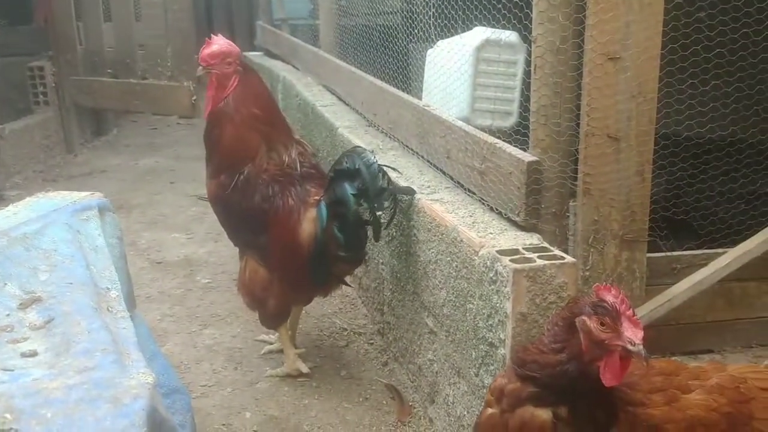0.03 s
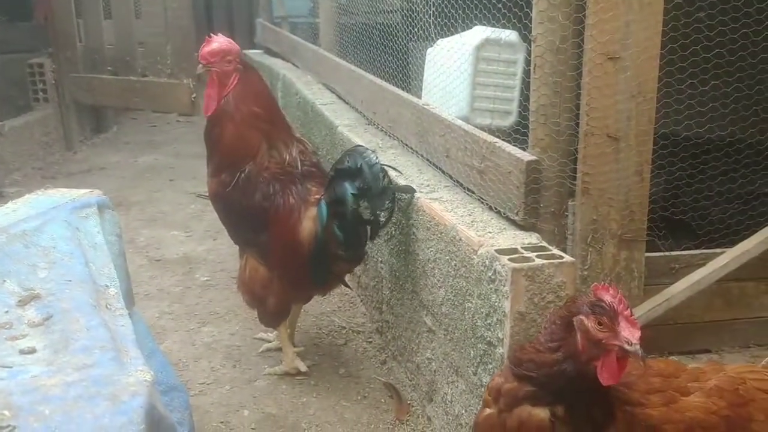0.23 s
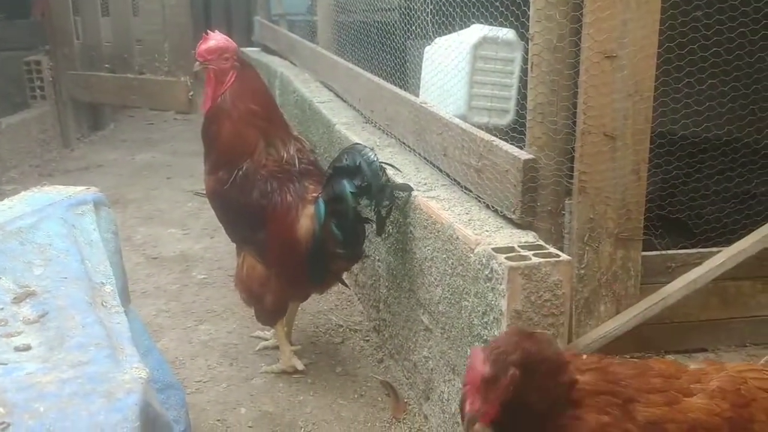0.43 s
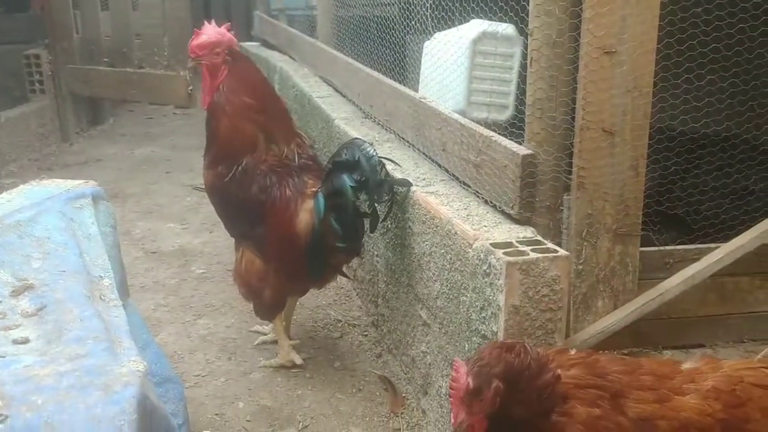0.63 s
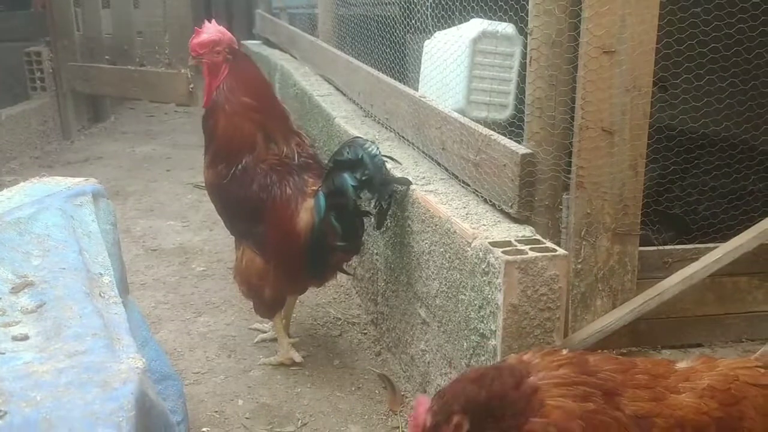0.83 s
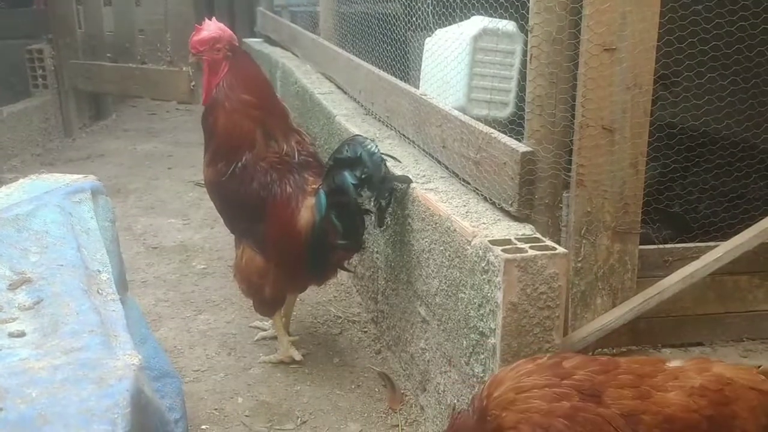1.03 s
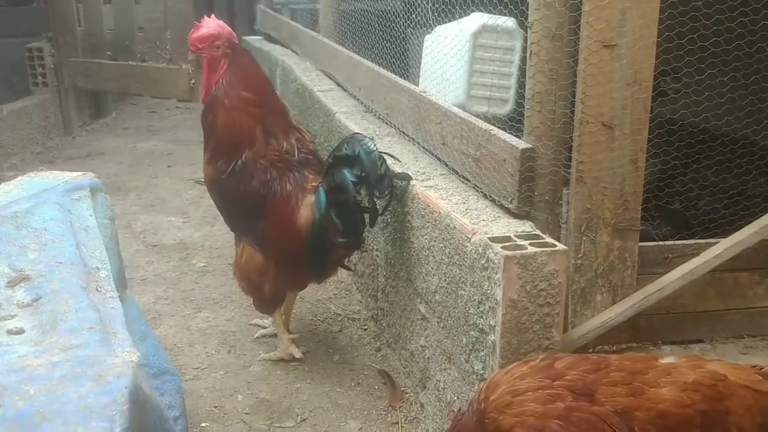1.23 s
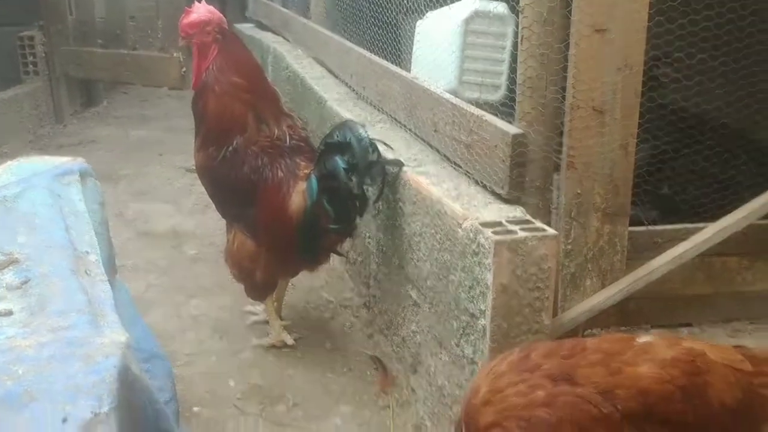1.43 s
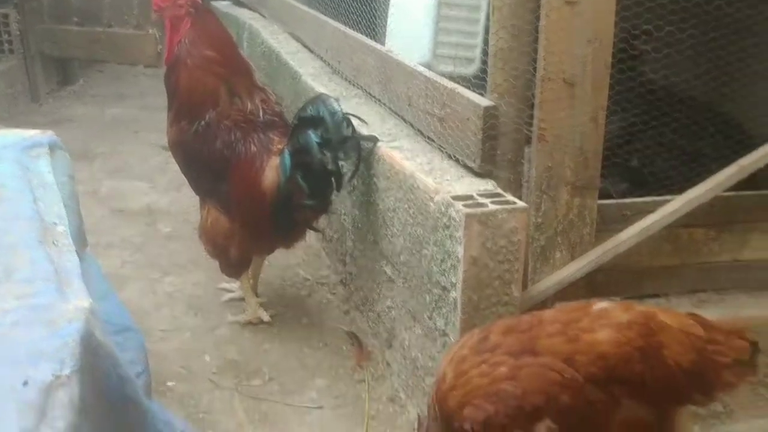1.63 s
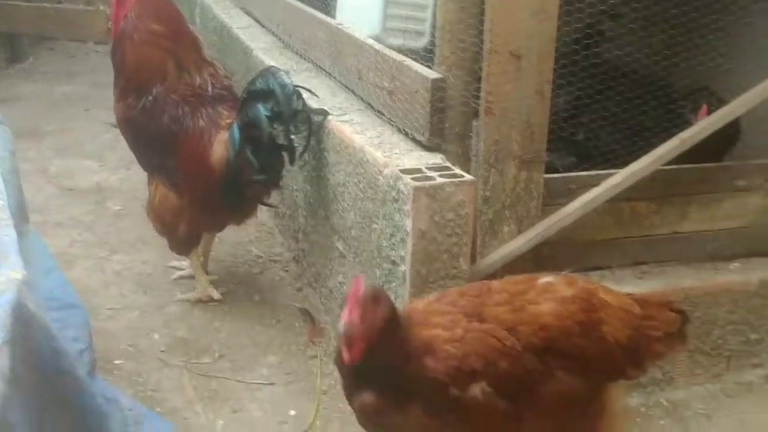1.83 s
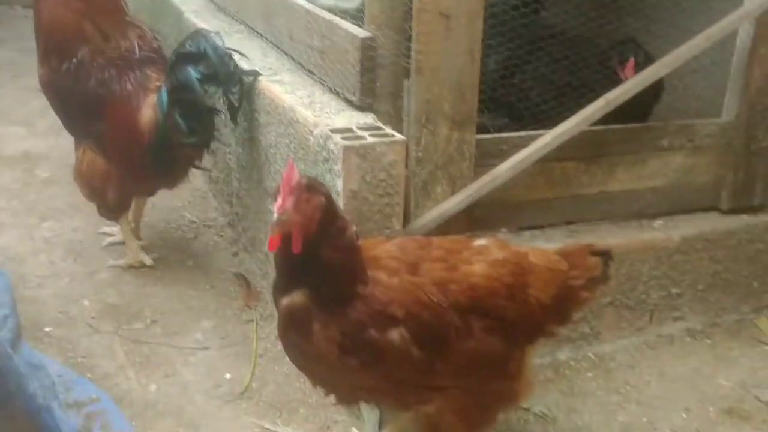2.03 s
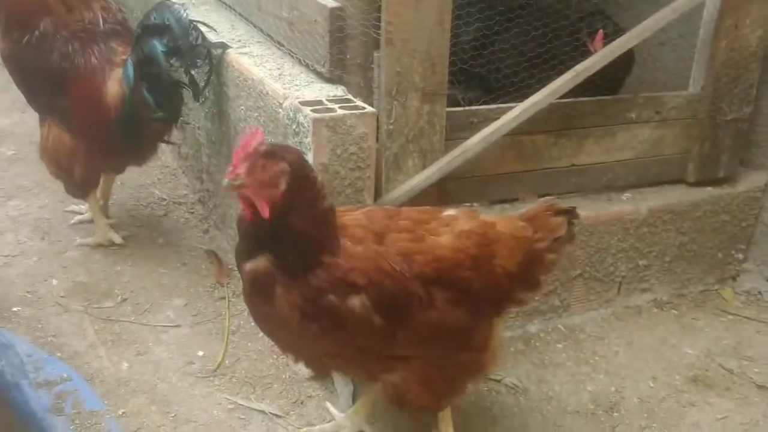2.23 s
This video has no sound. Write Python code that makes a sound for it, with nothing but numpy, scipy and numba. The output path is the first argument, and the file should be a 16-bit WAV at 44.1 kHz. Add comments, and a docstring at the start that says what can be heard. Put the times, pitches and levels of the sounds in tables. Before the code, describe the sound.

One long, raspy rooster crow falls in pitch, followed by a hen's soft cluck.

```python
"""A rooster starts one long, hoarse crow in a small yard, close to a phone. First the two sides of his
voice box (the syrinx) clash in a rasp. Then they lock in a buzz at half the pitch, while a hen scuffs
the dirt and air rumbles on the moving microphone. The crow clears into a falling tone and breaks off
in croaks. Last, the hen moans and clucks, and there is a soft knock."""
import sys
import numpy as np
from scipy import signal
from scipy.fft import rfft, irfft
from scipy.io import wavfile
from scipy.ndimage import uniform_filter1d, minimum_filter1d
from numba import njit

SR = 44100
rng = np.random.default_rng(int(sys.argv[2]) if len(sys.argv) > 2 else 0)


def master_out(mix):
    """Clip the mix to full scale and print it as 16-bit PCM to the path in sys.argv[1]."""
    frames = np.transpose(np.atleast_2d(mix))
    ceiling = np.clip(frames, -1, 1)
    pcm = np.round(ceiling * 32767).astype(np.int16)
    wavfile.write(sys.argv[1], SR, pcm)


N = 101165
T = np.arange(N) / SR
FREQS = np.arange(N // 2 + 1) * SR / N


def amp(db):
    """Turn decibels into a gain."""
    return 10 ** (np.asarray(db) / 20)


def unit(x):
    """Scale to an average power of 1."""
    return x / np.sqrt(np.mean(x ** 2))


def curve(rows, column=1):
    """Follow one column of a table over time."""
    return np.interp(T, np.array(rows)[:, 0], np.array(rows)[:, column])


def fader(rows, column=1):
    """Gain from a dB column, dying away outside the table's times."""
    outside = np.maximum(rows[0][0] - T, 0) + np.maximum(T - rows[-1][0], 0)
    return amp(curve(rows, column)) * np.exp(-outside / 0.011)


def level_at(tone, hz):
    """Look up a frequency in a tone table."""
    return np.interp(np.log(hz + 1), np.log(np.array(tone)[:, 0]), np.array(tone)[:, 1])


def colour(x, tone):
    """Filter by a tone table, then scale to power 1."""
    return unit(irfft(rfft(x) * amp(level_at(tone, FREQS)), N))


def noise():
    """Plain white hiss."""
    return rng.standard_normal(N)


def wander(hz):
    """A smooth random wobble, mostly slower than hz."""
    return unit(signal.sosfilt(signal.butter(2, hz, fs=SR, output="sos"), noise()))


def swell(start, length):
    """A rounded rise and fall."""
    return np.sin(np.pi * np.clip((T - start) / length, 0, 1))


def burst(start, decay, attack=.003):
    """A sudden start that dies away."""
    age = np.maximum(T - start, 0)
    return np.minimum(age / attack, 1) * np.exp(-age / decay)


def pulses(hz, scatter, spread_db):
    """Clicks of uneven spacing and size."""
    gap, size = rng.standard_normal((3000, 2)).T
    place = np.cumsum(np.exp(scatter * gap)) * SR / hz
    out = np.zeros(N)
    np.add.at(out, place[place < N].astype(int), amp(spread_db * size)[place < N])
    return unit(out - out.mean())


@njit
def resonate(x, hz, width):
    """Let through one moving band of frequencies."""
    y, band_state, low_state = np.empty(len(x)), 0., 0.
    for i in range(len(x)):
        tuning, damping = np.tan(np.pi * hz[i] / SR), width / hz[i]
        band = (band_state + tuning * (x[i] - low_state)) / (1 + tuning * (tuning + damping))
        band_state = 2 * band - band_state
        low_state += 2 * tuning * band
        y[i] = damping * band
    return y


# Tone of the yard (frequency [Hz], relative level [dB])
YARD_COLOUR = [(30, -35), (200, -14.5), (300, -8), (480, 1.5), (700, -2), (1500, -6.5), (2100, -11),
               (3000, -8.5), (4000, -16.5), (5000, -20.5), (11000, -35.5), (15000, -45)]
# Its loudness (time [s], level [dB])
YARD_LEVEL = [(0, -37), (1, -43), (1.5, -40), (1.9, -36.5), (2.29, -36.5)]
def yard():
    """A quiet wash of background noise."""
    return fader(YARD_LEVEL) * colour(noise(), YARD_COLOUR)


# Tone of the air (frequency [Hz], relative level [dB])
AIR_COLOUR = [(20, -34.5), (40, -17.5), (70, -1), (110, 0.5), (200, -6), (300, -13), (600, -47.5),
              (2000, -69.5)]
# Its loudness before the gusts (time [s], level [dB])
AIR_LEVEL = [(0, -47), (.7, -59.5), (.82, -38.5), (.92, -45), (.97, -41.5), (1.07, -33.5), (1.2, -40.5),
             (1.48, -29), (1.57, -30.5), (1.65, -30), (1.85, -40), (1.97, -34.5), (2.06, -38.5),
             (2.12, -24), (2.18, -39), (2.24, -28.5), (2.29, -35)]
def air_rumble():
    """A low, gusty rumble of air on the microphone, spread wide between left and right."""
    common, left, right = (colour(noise(), AIR_COLOUR) for _ in range(3))
    gusts = amp(3.05 * wander(15.8))
    return fader(AIR_LEVEL) * gusts * np.array([common + .5 * left, -common + .5 * right])


# Knock (time [s], pitch [Hz], decay [s], level [dB])
KNOCKS = [(2.225, 219, 0.058, -32)]
def knock():
    """A soft, hollow knock: one low tone dying away."""
    return sum(amp(db) * burst(start, decay) * np.sin(2 * np.pi * hz * (T - start))
               for start, hz, decay, db in KNOCKS)


# Tone of the dirt (frequency [Hz], relative level [dB])
DIRT_COLOUR = [(500, -20.5), (2200, -2), (3100, 1.5), (4200, -5.5), (6000, -22), (9500, -19),
               (15000, -42.5)]
# Foot strokes (time [s], length [s], level [dB])
FOOT_STROKES = [(0.76, 0.097, -50.5), (1.212, 0.077, -36.5), (1.538, 0.043, -38), (1.749, .06, -39.5),
                (1.851, 0.064, -37), (2.118, 0.041, -44)]
def scuffs():
    """The hen's feet drag through gritty dirt."""
    grit = colour(pulses(1200, scatter=.99, spread_db=2.8) + noise(), DIRT_COLOUR)
    return grit * sum(amp(db) * swell(start, length) for start, length, db in FOOT_STROKES)


# Clucks (time [s], length [s], pitch [Hz], level [dB])
HEN_CLUCKS = [(2.13, 0.011, 457, -19), (2.14, 0.02, 489, -15)]
# Their harmonics, the tones at 1, 2 and 3 times the pitch (relative level [dB])
CLUCK_HARMONICS = [-0.5, -19, -26]
# Moan (time [s], pitch [Hz], levels of harmonics 2, 3, 4 [dB])
HEN_MOAN = [(2.02, 343, -58, -52, -70), (2.045, 343, -33.5, -34, -56), (2.09, 349, -51, -38, -60),
            (2.12, 382, -43, -40.5, -57), (2.155, 390, -39.5, -47, -41.5), (2.28, 376, -47, -56, -49)]
def hen():
    """A soft, nearly pure double cluck over a thin moan."""
    clucks = sum(amp(db + part_db) * swell(start, length) * np.sin(2 * np.pi * k * hz * (T - start))
                 for start, length, hz, db in HEN_CLUCKS for k, part_db in enumerate(CLUCK_HARMONICS, 1))
    phase = 2 * np.pi * np.cumsum(curve(HEN_MOAN) * (1 + .0093 * wander(150))) / SR
    moan = sum(fader(HEN_MOAN, column=k) * np.sin(k * phase) for k in (2, 3, 4))
    return clucks + np.sqrt(2) * moan


# Tone of the croaks (frequency [Hz], relative level [dB])
CROAK_COLOUR = [(200, -15.5), (400, -7), (680, 0.5), (900, -6), (1150, -5.5), (1400, -18.5), (1600, -11.5),
                (2000, -19), (2700, -22), (5000, -34), (12000, -52)]
# Croaks (time [s], decay [s], level [dB])
CROAK_BURSTS = [(1.816, 0.0217, -23), (1.837, 0.023, -20.5), (1.924, .02, -24), (1.963, 0.026, -28.5),
                (1.998, 0.02, -24.5), (2.017, 0.014, -24.5)]
def croaks():
    """Loose pulses rattle as the crow breaks off."""
    rattle = colour(pulses(327.5, scatter=.33, spread_db=.72) + .61 * noise(), CROAK_COLOUR)
    return rattle * sum(amp(db) * burst(start, decay) for start, decay, db in CROAK_BURSTS)


def airway(x, bands, times):
    """Ringing bands glide as the neck and beak relax; times are the start, middle and end."""
    out = 0
    for start_hz, middle_hz, end_hz, width, *db in bands:
        hz = np.interp(T, times, [start_hz, middle_hz, end_hz])
        band = x
        for _ in range(4):  # each pass makes the band's edges steeper
            band = resonate(band, hz, float(width))
        out = out + amp(np.interp(T, times, db)) * band
    return unit(out)


# Bands where the throat rings (start, middle, end [Hz], width [Hz], start, middle, end level [dB])
THROAT_BANDS = [(695, 612, 508.3, 206, -1.5, 2.5, 3.5), (1006, 960, 967, 497, -2.5, 1, -5),
                (1584, 1560, 1288, 387, -1.5, -1, 0), (1867, 1924, 1567, 570, -8, -9, -5),
                (2602, 2490, 2503, 304, -9, -9, -18.5)]
# Bands where the beak rings (start, middle, end [Hz], width [Hz])
BEAK_BANDS = [(2900, 2850, 2850, 800), (3800, 3750, 3700, 550), (4650, 4480, 4850, 800),
              (5500, 5450, 5700, 1000), (6600, 6850, 6500, 1100), (7600, 7350, 7200, 1200),
              (9600, 10500, 10500, 3500)]
# Their strengths (start, middle, end level [dB])
BEAK_LEVELS = [(5, -3.5, 0.5), (6.5, 10, -16), (-3, -2, 4), (-6.5, -11.5, -4.5), (-1, -4.5, -4),
               (-9.5, -12, -23.5), (-18.5, -27, -11.5)]
# Loudness of the rasp (time [s], throat level [dB], beak level [dB])
RASP_LEVEL = [(0, -18, -38), (.2, -19.5, -41), (.38, -18, -42), (.44, -22.5, -45), (.6, -21, -44),
              (.76, -23.5, -46), (.95, -22, -49.5), (1.12, -20, -49.5), (1.3, -23.5, -48),
              (1.47, -24.5, -48), (1.505, -31, -46.5), (1.6, -32, -50), (1.65, -58, -53), (1.83, -60, -70)]
def rasp(flutter):
    """The two sides of the voice box clash in uneven pulses that ring in the throat and beak."""
    clash = pulses(700.1, scatter=.33, spread_db=4)
    breath = clash + 4.7 * noise()
    beak_bands = [(*band, *levels) for band, levels in zip(BEAK_BANDS, BEAK_LEVELS)]
    throat = fader(RASP_LEVEL) * airway(clash, THROAT_BANDS, times=[.39, .47, 1.3])
    beak = fader(RASP_LEVEL, column=2) * airway(breath, beak_bands, times=[.16, .52, 1.5])
    return throat * amp(1.7 * flutter) + beak * amp(3.9 * flutter)


# High note (time [s], pitch [Hz], levels of harmonics 1, 2 [dB])
HIGH_NOTE = [(0, 747.3, -15.5, -25), (.085, 780, -16.5, -20.5), (.135, 768, -23.5, -23.5),
             (.175, 761.6, -14.5, -19), (.215, 757.1, -23, -26), (.275, 750.2, -13.5, -18.5),
             (.315, 750.4, -27, -38.5), (.378, 744.2, -16.5, -22), (.415, 735.6, -28, -27),
             (.44, 562, -25, -51), (.65, 548.3, -27.5, -29), (.8, 546.6, -18, -30),
             (.94, 535.1, -20.5, -28), (1.0, 532.9, -31, -38), (1.06, 534, -22, -53),
             (1.13, 488.5, -29.5, -39.5), (1.25, 489.3, -34.5, -49.5), (1.44, 539.4, -38, -61),
             (1.48, 559, -20, -37), (1.51, 562.1, -34, -69)]
def high_voice(phase, flutter):
    """The opening note drops and fades; the flutter rocks it between its two harmonics."""
    first = fader(HIGH_NOTE, column=2) * amp(-2.2 * flutter) * np.sin(phase)
    second = fader(HIGH_NOTE, column=3) * amp(4.5 * flutter) * np.sin(2 * phase)
    return first + second


# Low note (time [s], pitch [Hz])
LOW_PITCH = [(.6, 460), (.85, 460.2), (.99, 464.9), (1.04, 443.6), (1.085, 470.4), (1.13, 442),
             (1.21, 435.7), (1.26, 476), (1.39, 481), (1.46, 470.5), (1.504, 469.6), (1.55, 469.6),
             (1.596, 464.7), (1.606, 455.2), (1.68, 444), (1.724, 429.5), (1.82, 399.2)]
# Its loudness (time [s], levels of harmonics 1, 2, 3, 4 [dB], level of the higher ones [dB])
LOW_LEVELS = [(.58, -54, -30, -70.5, -76, -77), (.84, -50.5, -31.5, -48.5, -59, -59.5),
              (.98, -31, -23.5, -31.5, -52, -58), (1.022, -26.5, -26, -27.5, -52, -71),
              (1.038, -29, -21, -26.5, -52, -62), (1.19, -35.5, -30, -31, -70, -58),
              (1.31, -30.5, -20, -23.5, -49, -57.5), (1.41, -24.5, -25, -22.5, -63, -55),
              (1.465, -29, -27.5, -34, -76, -64), (1.51, -22, -24, -20.5, -61, -54.5),
              (1.598, -21.5, -28.5, -39.5, -78, -48), (1.607, -21, -17, -25.5, -45, -41.5),
              (1.695, -22.5, -23, -33, -52, -44.5), (1.715, -27, -23.5, -32, -27.5, -43),
              (1.74, -26, -32.5, -23, -37.5, -55.5), (1.785, -31, -25, -23.5, -28, -72),
              (1.812, -35, -42, -20.5, -23, -54), (1.835, -61, -55, -47, -57, -73)]
# How the throat shapes the higher ones (frequency [Hz], gain [dB])
THROAT_GAIN = [(2000, -23), (2600, -17), (3400, -20), (4000, -5), (4500, -2), (4690, 5), (4850, 1),
               (5000, 3), (5300, -17.5), (6600, -17), (7100, -24), (7550, -13), (8500, -34), (10800, -18),
               (13000, -38)]
# Half-pitch buzz (time [s], level [dB])
BUZZ_LEVEL = [(1.2, -36), (1.38, -29), (1.42, -31), (1.48, -30), (1.51, -19), (1.595, -18.5), (1.61, -43),
              (1.64, -72)]
# Its tones, halfway between harmonics (frequency [times the pitch])
BUZZ_TONES = [1.5, 2.5, 3.5, 10.5]
# Their strengths (relative level [dB])
BUZZ_GAINS = [-13.5, -3, -14, -27]
def low_voice(phase):
    """The low note buzzes while its wave repeats only every second swing, then clears and falls."""
    hz = curve(LOW_PITCH)
    body = sum(fader(LOW_LEVELS, column=k) * np.sin(k * phase) for k in range(1, 5))
    flicker_db = 2.5
    treble = sum(amp(level_at(THROAT_GAIN, k * hz) + flicker_db * wander(20)) * np.sin(k * phase)
                 for k in range(5, 29))
    buzz = sum(amp(db) * np.sin(k * phase) for k, db in zip(BUZZ_TONES, BUZZ_GAINS))
    return body + fader(LOW_LEVELS, column=5) * treble + fader(BUZZ_LEVEL) * buzz


# Shakiness of the voice (time [s], amount [relative])
SHAKINESS = [(0, .02), (.17, .019), (.22, .036), (.45, .04), (.85, .02), (1.15, .031), (1.35, .028),
             (1.47, .026), (1.51, .005), (1.82, .005)]
def membrane(hz, shake):
    """One side of the voice box vibrates, unsteady in pitch and strength."""
    rough = shake * curve(SHAKINESS)
    phase = 2 * np.pi * np.cumsum(hz * (1 + rough * wander(255))) / SR
    strength = 1 + 8.2 * rough * wander(110)
    return phase, strength


# Extra tones (time [s], level at high + low pitch [dB], level at twice high + low pitch [dB])
MIXED_TONES = [(.5, -43, -42.5), (.7, -28.5, -31.5), (.85, -27, -23.5), (.96, -26.5, -26),
               (1.03, -34.5, -43), (1.2, -31, -30.5), (1.42, -47.5, -44.5)]
def voice_box(flutter):
    """Each side sings a note; as they drive each other, tones appear at sums of their pitches."""
    high_phase, high_strength = membrane(curve(HIGH_NOTE), shake=.94)
    low_phase, low_strength = membrane(curve(LOW_PITCH), shake=.75)
    mixed = sum(fader(MIXED_TONES, column=k) * np.sin(k * high_phase + low_phase) for k in (1, 2))
    high = high_strength * (high_voice(high_phase, flutter) + mixed)
    low = low_strength * low_voice(low_phase)
    return np.sqrt(2) * (high + low)


# Fast trembling of the voice (time [s], rate [Hz])
FLUTTER_RATE = [(0, 39.32), (.42, 37.4), (.6, 30.13), (1.0, 27.87), (1.5, 34.3)]
def crow():
    """Rasp and voice flutter together, with a short squeak in the opening note."""
    flutter_hz = curve(FLUTTER_RATE) * (1 + .098 * wander(14))
    flutter = np.sin(2 * np.pi * np.cumsum(flutter_hz) / SR)
    squeak = amp(-7) * burst(start=.201, decay=.022) * np.sin(2 * np.pi * 1065 * T)
    bass_cut = signal.butter(8, 390, "high", fs=SR, output="sos")
    return signal.sosfilt(bass_cut, rasp(flutter) + voice_box(flutter) + squeak)


def wall_echo(x, fade_s=.12, top_hz=2700, level_db=-7):
    """Low walls return a short, dull echo, different on the left and right."""
    t = T[:SR // 2]
    tails = rng.standard_normal((2, len(t))) * amp(-60 * t / fade_s) * (t > .004)
    dull = signal.sosfilt(signal.butter(1, top_hz, fs=SR, output="sos"), x)
    echoes = [signal.fftconvolve(dull, tail / np.linalg.norm(tail))[:N] for tail in tails]
    return amp(level_db) * np.array(echoes)


# How far the left wave is ahead; negative is behind (frequency [Hz], phase [radians])
LEFT_LEAD = [(0, 0), (1000, -.1), (1250, -.4), (1500, -1.4), (2580, -4.7), (7240, -18.6), (15000, -41.5)]
# Balance (frequency [Hz], left minus right level [dB])
BALANCE = [(60, -3.5), (110, 0), (200, -8.5), (380, -4), (690, -4), (1280, 1), (2360, -1), (4360, 1),
           (8040, 1), (14800, 0)]
def microphone(x):
    """The microphone's two openings hear the sound with a lag and at different levels."""
    lead = np.interp(FREQS, *np.array(LEFT_LEAD).T)
    tilt = amp(level_at(BALANCE, FREQS) / 2)
    return np.array([irfft(rfft(x) * tilt * np.exp(1j * lead), N), irfft(rfft(x) / tilt, N)])


def scene():
    """The birds and their echo, over yard noise and rumbling air."""
    close = crow() + croaks() + hen() + scuffs() + knock()
    shared, left, right = yard(), yard(), yard()
    return microphone(close + shared) + wall_echo(close) + .47 * np.array([left, right]) + air_rumble()


def record(dry):
    """The phone turns down the loudest peaks and cuts the highest treble."""
    ceiling, top_hz = .85, 15400
    allowed = ceiling / np.maximum(np.abs(dry).max(axis=0), ceiling)
    gain = uniform_filter1d(minimum_filter1d(allowed, size=401), size=401)
    return signal.sosfilt(signal.ellip(8, .2, 70, top_hz, fs=SR, output="sos"), dry * gain)


dry = scene()
out = record(dry)
master_out(out)
```